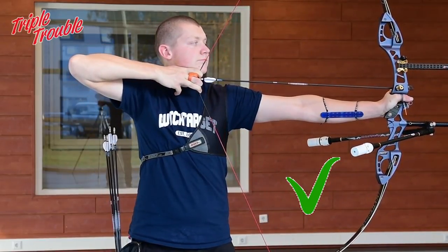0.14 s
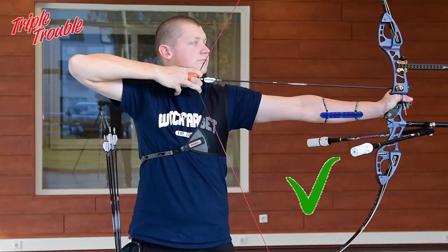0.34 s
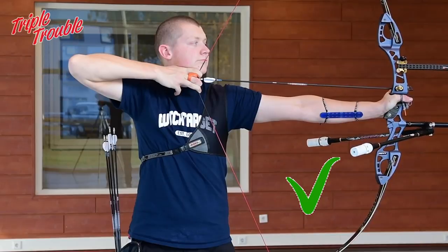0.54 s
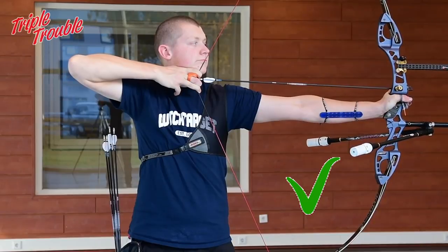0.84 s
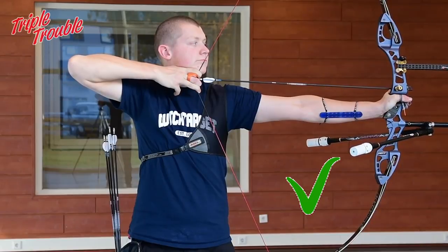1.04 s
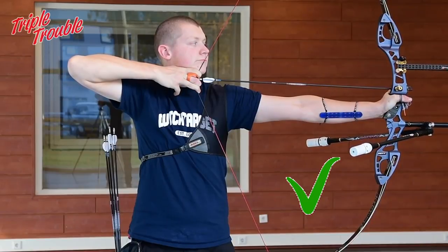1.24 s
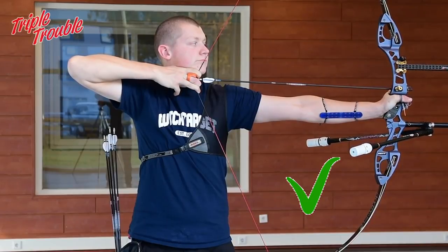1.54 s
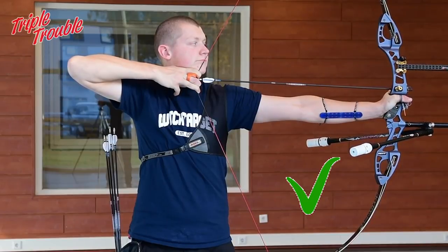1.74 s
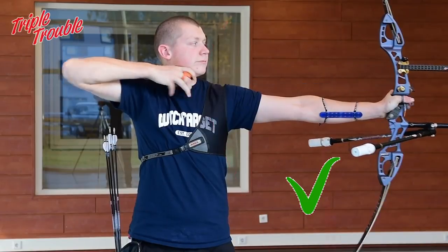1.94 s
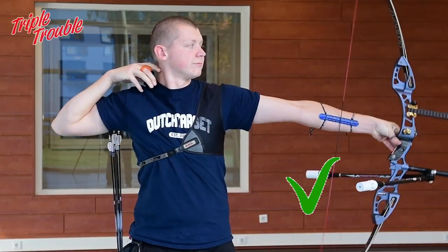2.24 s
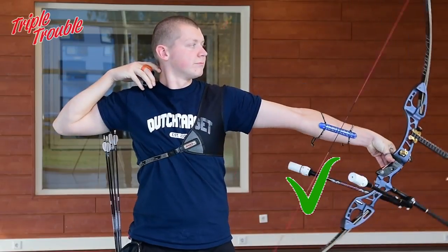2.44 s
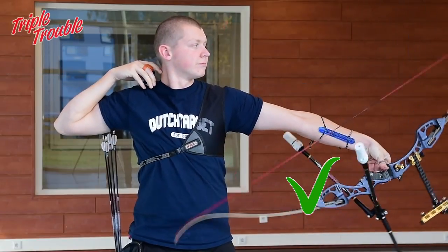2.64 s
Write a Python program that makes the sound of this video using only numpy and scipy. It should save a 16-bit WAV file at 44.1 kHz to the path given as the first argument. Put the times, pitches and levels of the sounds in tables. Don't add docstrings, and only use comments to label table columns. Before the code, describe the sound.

A bow shot heard close in a large hard-walled hall: quiet ventilation rumble, a thin metallic click, then a whistling string slam with tiny ticks, a dull far thud, wall slaps and long ringing reverberation.

```python
import sys
import numpy as np
from scipy import signal
from scipy.fft import rfft, irfft, next_fast_len
from scipy.io import wavfile
from scipy.ndimage import map_coordinates

SR = 44100
rng = np.random.default_rng(int(sys.argv[2]) if len(sys.argv) > 2 else 0)


def dump(signal):
    limited = np.clip(np.atleast_2d(signal).T, -1, 1)
    pcm = np.round(limited * 32767).astype(np.int16)
    wavfile.write(sys.argv[1], SR, pcm)


def boost_factor(decibels):
    exponent = np.asarray(decibels, float) / 20
    return 10 ** exponent


N = 123479


def unit(x):
    return x / np.sqrt(np.mean(x ** 2) + 1e-20)


def along(points, hz):
    f, value = np.transpose(points)
    return np.interp(np.log(hz + 1), np.log(f + 1), value)


def filtered(x, response):
    size = next_fast_len(len(x) + 8192)
    spectrum = rfft(x, size) * response(np.fft.rfftfreq(size, 1 / SR))
    return irfft(spectrum, size)[:len(x)]


def hiss(colour, size):
    return unit(filtered(rng.standard_normal(size), lambda hz: boost_factor(along(colour, hz))))


def wobble(rate):
    return map_coordinates(rng.standard_normal(N // 20), [np.arange(N) * rate / SR])


def add(track, start_s, sound):
    part = track[round(start_s * SR):][:len(sound)]
    part += sound[:len(part)]


def decay(t, level_db, t60_s):
    return boost_factor(level_db - 60 * t / t60_s)


def swell(t, rise_s):
    return 1 - np.exp(-t / rise_s)


def peaks(rows, hz):
    return sum(boost_factor(db) / (1 + ((hz - centre) / (width / 2)) ** 2) for centre, width, db in rows)


def ring(modes, rise_s, dull_db_per_khz=0):
    t = np.arange(SR // 2) / SR
    out = np.zeros(len(t))
    for hz, db, t60_s in modes:
        level_db = db - dull_db_per_khz * hz / 1e3 + rng.normal(0, 1)
        out += decay(t, level_db, t60_s) * np.sin(2 * np.pi * hz * t)
    return out * swell(t, rise_s)


def pings(events):
    out, t = np.zeros(N), np.arange(4096) / SR
    for start_s, level_db, hz, t60_s in events:
        bandwidth_hz = 0.3 * hz
        band = lambda f: np.exp(-((f - hz) / bandwidth_hz) ** 2)
        blur = unit(filtered(rng.standard_normal(len(t)), band))
        tone = np.sin(2 * np.pi * hz * t)
        add(out, start_s, decay(t, level_db, t60_s) * (0.7 * tone + 0.8 * blur))
    return out


# pitch_hz, t60_s
HALL_DECAY = [(100, 2.16), (280, 2.12), (520, 2.3), (1100, 1.356), (3300, 1.91), (6000, 1.21), (10000, 0.9),
              (15000, 0.63)]


def tail():
    hz, t, bins = signal.stft(rng.standard_normal(3 * SR // 2), SR, nperseg=256)
    dying = boost_factor(-60 * t / along(HALL_DECAY, hz)[:, None])
    return signal.istft(bins * dying, SR, nperseg=256)[1]


def hall(start_s, level_db, colour, spread=1):
    gap_s, rise_s = 0.0067, 0.016
    out, ringing = np.zeros(N), filtered(tail(), colour)
    ringing /= np.std(ringing[:SR // 10])
    since_gap = np.maximum(np.arange(len(ringing)) / SR - gap_s, 0)
    add(out, start_s, boost_factor(level_db) * swell(since_gap, spread * rise_s) * ringing)
    flutter_db = 1.1 * wobble(70)
    return out * boost_factor(flutter_db)


# pitch_hz, width_hz, level_db
RISER = [(569, 35, 4.5), (230, 99, -2), (364, 60, -7.5), (2350, 33, -24), (3100, 200, -17),
         (4680, 1160, -7.5), (866, 27, 2.5)]


def bow_colour(points, hz):
    return boost_factor(along(points, hz)) * (1 + peaks(RISER, hz))


# pitch_hz, level_db
VENTILATION = [(15, -23), (30, -16), (60, 0.5), (105, 0.5), (140, -6), (225, -2.5), (400, -13.5),
               (1500, -29.5), (2500, -46)]
# pitch_hz, level_db
MIC_HISS = [(710, -41), (1200, -3.5), (3050, -8), (3790, -9), (14200, -18.5), (16000, -15.5)]


def room_tone():
    air_db = -44.5 + 0.56 * wobble(2.88) + 0.58 * wobble(10)
    return boost_factor(air_db) * hiss(VENTILATION, N) + boost_factor(-64) * hiss(MIC_HISS, N)


# start_s, level_db
THUDS = [
    (2.101, -14),
    (2.173, -21),
    (2.274, -18),
]
# pitch_hz, level_db, t60_s
BUTT = [(115, 0, .13), (180, -1, .09), (235, -10, .25), (60, -9, .05)]
# pitch_hz, level_db
THUD_COLOUR = [(50, -19), (115, 1.5), (600, 3.5), (1000, -7), (3500, -8.5), (6000, -6.5), (9000, -17.5),
               (15500, -26)]


def butt():
    out = np.zeros(N)
    for start_s, level_db in THUDS:
        add(out, start_s, boost_factor(level_db) * ring(BUTT, 0.0043))
    return out + hall(THUDS[0][0], -23, lambda f: bow_colour(THUD_COLOUR, f), spread=1.2)


# start_s, level_db, pitch_hz, t60_s
TICKS = [(1.9928, -16, 8200, .02), (1.9928, -28, 15000, .008), (1.9955, -24, 12700, .01),
         (2.0047, -20, 12200, .008), (2.012, -24, 9000, .012), (2.0172, -18, 13300, .005),
         (2.0202, -23, 12300, .007), (2.026, -22, 14000, .008), (2.029, -25, 11500, .01),
         (2.039, -28, 11000, .008), (2.1, -31, 14000, .04), (2.119, -28, 11500, .02),
         (2.128, -29, 13000, .04), (2.152, -33, 13500, .06), (2.4195, -48, 11500, .015),
         (2.4424, -41, 11000, .012), (2.4832, -40, 12500, .012), (.7905, -54, 4200, .05),
         (1.4795, -48, 3400, .015), (1.483, -47, 1600, .03), (.545, -62, 3000, .04), (.792, -56, 2200, .04)]


def ticks():
    return pings(TICKS)


# start_s, level_db, dulling_db_per_khz
SNAPS = [
    (1.8308, -32, -.3),
    (1.8345, -27, .5),
    (1.8403, -43, 0),
]
# pitch_hz, level_db, t60_s
BLADE = [(1130, -23, .06), (1927, -1.5, 0.048), (2776, -6.5, 0.054), (4540, -5, 0.017), (5330, -12, 0.065),
         (8156, -5, .045), (8600, -14, .035), (10300, -25, .039), (12300, -4, 0.016), (14600, 2, 0.0074)]
# start_s, level_db, pitch_hz, t60_s
TOUCHES = [
    (1.8309, -16, 14200, .0035),
    (1.8402, -31, 14000, .005),
]
# pitch_hz, width_hz, level_db
BLADE_FAR = [(1450, 270, -18), (1920, 140, -3), (2830, 130, -7), (3410, 50, -10), (4000, 160, -14),
             (4660, 110, -16), (5630, 330, -10), (6240, 110, -5.5), (7830, 160, -10), (7980, 230, -12),
             (10800, 500, -21), (12150, 500, -16)]
# pitch_hz, level_db
BLADE_BED = [(700, -60), (1200, -24), (6000, -18), (9000, -23), (15500, -28)]


def clicker():
    near, t = pings(TOUCHES), np.arange(4096) / SR
    for start_s, level_db, dull_db_per_khz in SNAPS:
        add(near, start_s, boost_factor(level_db) * ring(BLADE, 0.00015, dull_db_per_khz))
    snap_s = SNAPS[0][0]
    rattle = hiss([(700, -38), (1500, 3), (15500, -11)], len(t))
    add(near, snap_s, decay(t, -30.5, 0.044) * rattle)
    return near + hall(snap_s, -40.5, lambda f: boost_factor(along(BLADE_BED, f)) + peaks(BLADE_FAR, f))


# start_s, pitch_hz, level_db
WHISTLE = [
    (1.994, 2500, -40),
    (1.997, 2700, -16),
    (1.9995, 3100, -15),
    (2.002, 4400, -11),
    (2.006, 4100, -15),
    (2.010, 4500, -19),
    (2.015, 3200, -26),
    (2.022, 2750, -15),
    (2.028, 2600, -40),
]
# pitch_hz, level_db
SWISH = [(250, -40), (600, -6), (2500, 0), (4500, -2), (6000, -16), (8000, -11), (12000, -15), (15500, -20)]


def string():
    start_s, hz, db = np.transpose(WHISTLE)
    t = np.arange(N) / SR
    phase = 2 * np.pi * np.cumsum(np.interp(t, start_s, hz)) / SR
    phase += 1.1 * wobble(900)
    level_db = np.interp(t, start_s, db, -120, -120) + 1.8 * wobble(700)
    out = boost_factor(level_db) * np.sin(phase)
    t = t[:SR // 4]
    add(out, 1.989, decay(t, -13.5, 0.14) * swell(t, 0.006) ** 2 * hiss(SWISH, len(t)))
    return out


# pitch_hz, level_db, t60_s
LIMBS = [(212, -8, 0.04), (388.4, -26, 0.41), (559, -22.5, 0.6), (1122, -24, 0.3)]
# pitch_hz, level_db
SLAM = [(60, 0), (150, -3.5), (500, -4), (1500, -5.5), (3000, -5.5), (5500, -11), (8500, -16.5),
        (15500, -31.5)]


def limbs():
    slam_s, low_cut_hz = 2.003, 90
    out, t = np.zeros(N), np.arange(SR // 2) / SR
    slam = decay(t, -9.5, 0.17) * swell(t, 0.012) * hiss(SLAM, len(t))
    add(out, slam_s, slam + ring(LIMBS, 0.0013))
    out += hall(slam_s, -14.5, lambda f: bow_colour(SLAM, f))
    return filtered(out, lambda f: (1j * f / (low_cut_hz + 1j * f)) ** 2)


def scene():
    return (room_tone() + butt() + ticks() + clicker() + string() + limbs())[None]


def band_limit(x):
    return signal.sosfilt(signal.butter(12, 16840, fs=SR, output="sos"), x)


def record(dry):
    ceiling, knee = 0.6, 3
    top_hz, slope_hz, end_hz = 15800, 100, 16800
    held = dry[0] / (1 + np.abs(dry[0] / ceiling) ** knee) ** (1 / knee)
    top_cut = lambda hz: boost_factor(-34 * np.clip((hz - top_hz) / slope_hz, 0, 1)) * (hz < end_hz)
    return band_limit(filtered(held, top_cut)[None])


dry = scene()
out = record(dry)
dump(out)
```